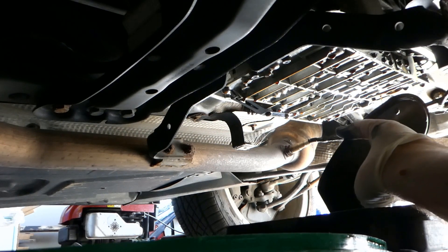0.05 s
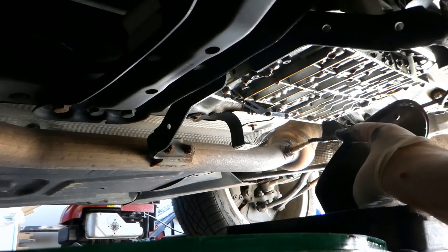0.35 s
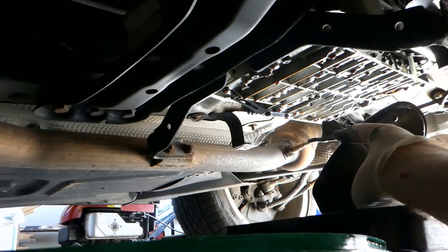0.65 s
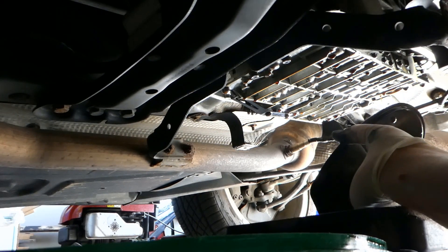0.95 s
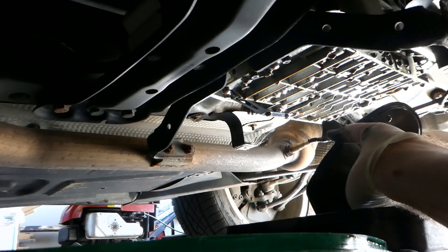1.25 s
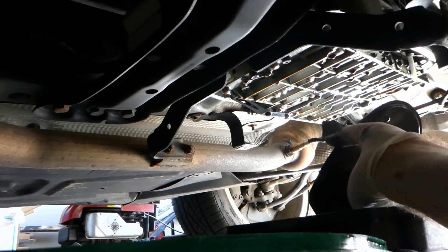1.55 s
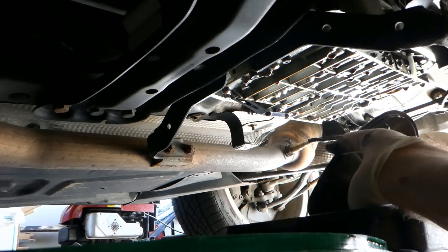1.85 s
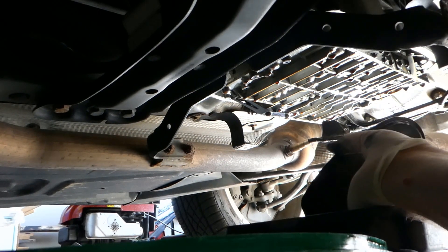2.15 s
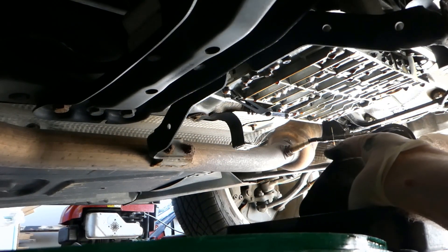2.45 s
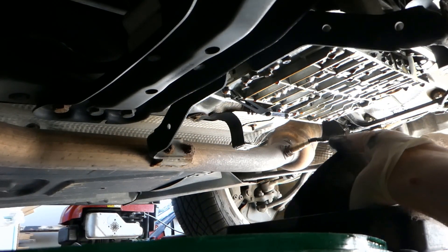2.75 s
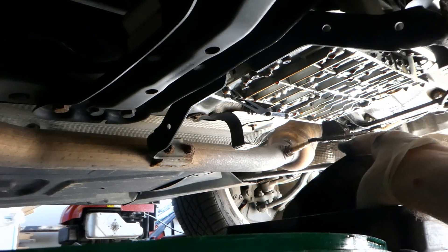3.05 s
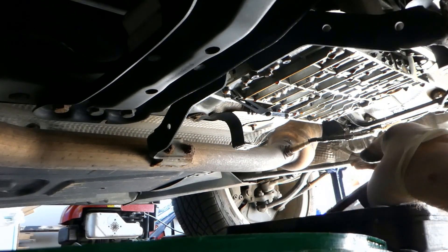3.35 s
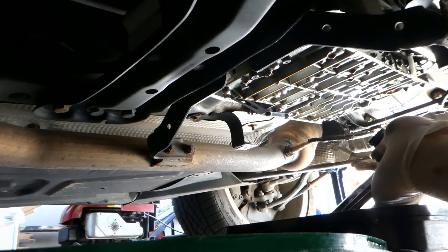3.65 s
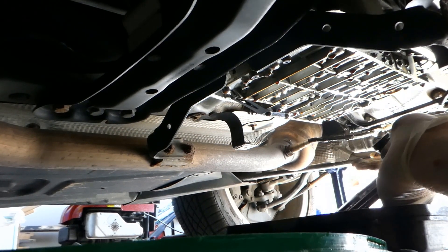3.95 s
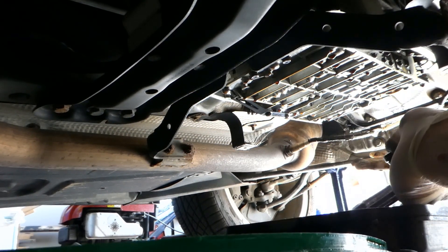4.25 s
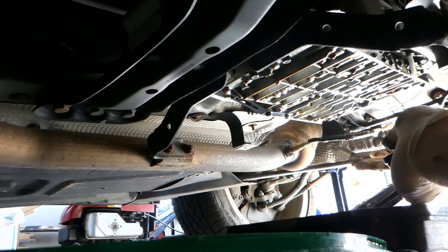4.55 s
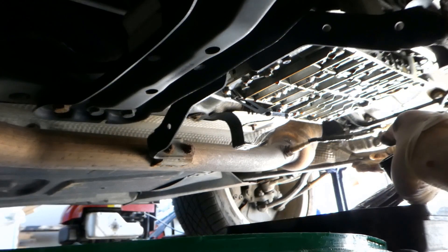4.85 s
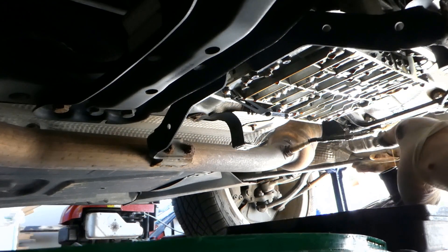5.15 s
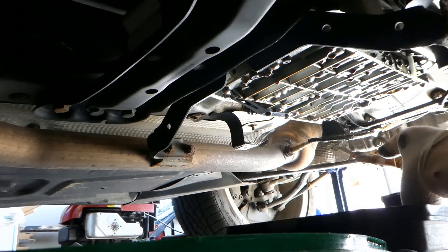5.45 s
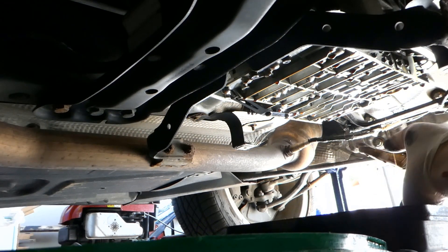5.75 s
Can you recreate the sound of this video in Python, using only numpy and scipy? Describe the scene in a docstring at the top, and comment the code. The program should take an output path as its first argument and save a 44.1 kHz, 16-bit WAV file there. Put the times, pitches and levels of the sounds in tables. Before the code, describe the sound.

Oil dribbles wetly into a plastic drain pan and thins to drips, then the pan is knocked and shifted on the floor.

```python
"""Oil dribbling into a drain pan

Oily fluid dribbles from under a car into a plastic pan close by, its pops and tiny bubbles ringing
in quick wet bursts. A part knocks down into the pan, and the dribble thins to single drips.
The pan booms and clacks as it is bumped, and rubs on the floor as it shifts; a glove scuffs softly.
The floor and the car's underside echo closely, over the hum of a garage."""
import sys
import numpy as np
from scipy import signal
from scipy.fft import rfft, irfft
from scipy.io import wavfile
from scipy.ndimage import uniform_filter1d

SR = 44100
rng = np.random.default_rng(int(sys.argv[2]) if len(sys.argv) > 2 else 0)


def output_pcm(signal):
    """Save a mono or channel-first signal as 16-bit PCM at the path in sys.argv[1].

    Samples are clipped to [-1, 1] before scaling.
    """
    pcm = np.clip(np.atleast_2d(signal).T, -1, 1) * 32767
    wavfile.write(sys.argv[1], SR, np.round(pcm).astype(np.int16))


N = 260190

# The tone of the garage's rumble and hiss. Each row: frequency in Hz, relative level in dB.
RUMBLE_TONE = [(20, -23), (45, -47), (70, -7), (120, -1.5), (190, -2), (240, -5), (400, -7), (600, -11),
               (1200, -23), (2500, -69)]
HISS_TONE = [(700, 7), (1400, 4), (2300, 6), (4000, 1), (6300, 0), (7900, -6), (9200, -3.5), (12000, -9.5),
             (15000, -17)]
# How loud the hiss is. Each row: time in seconds, level in dB.
HISS_LEVELS = [(0, -54.5), (1.4, -56.5), (4.5, -55.5), (5.9, -51.5)]
# The notes of the hum. Each row: pitch in Hz, level in dB.
HUM_NOTES = [(122, -59), (186, -65.5)]
# Rumble and hiss come from the left. Each row: frequency in Hz, boost of the left ear in dB.
LEFT_BOOST = [(80, 1), (200, 3.5), (500, 4.5), (1000, 5), (2000, 1), (5000, -1)]
# How alike the ears hear far and near noise. Each row: frequency in Hz, likeness (1 same, -1 opposite).
FAR_LIKENESS = [(30, -1.5), (80, 0.4), (180, 0.44), (280, -0.17), (450, -0.48), (1100, -0.65), (2000, 0.17),
                (4000, 0.6), (12000, 0.56)]
NEAR_LIKENESS = [(30, .5), (150, 0.87), (500, 0.95), (1200, 0.78), (3000, 0.79), (12000, 0.73)]
# The garage's echo. Each row: frequency in Hz, seconds to fade by 60 dB.
ECHO_FADES = [(100, 0.3), (400, 0.18), (1000, 0.73), (3000, 0.23), (7000, 0.087), (15000, 0.043)]
# Scuffs of the glove and slides of the pan. Each row: start in seconds, level in dB, length in seconds.
GLOVE_SCUFFS = [(1.54, -57, 0.22), (3.17, -61, .089), (4.154, -54.5, 0.09), (4.327, -53, 0.041),
                (4.68, -58.5, 0.37), (5.386, -50, 0.14), (5.67, -50, 0.056)]
PAN_SLIDES = [(2.771, -34, 0.075), (4.374, -43, .04), (4.77, -45, 0.064), (4.916, -44.5, 0.053),
              (5.038, -50.5, 0.26), (5.371, -45.5, .08), (5.523, -39.5, 0.083)]
# The notes the pan rings with. Each row: pitch in Hz, relative level in dB, seconds to fade by 60 dB.
PAN_NOTES = [(124.8, -8, 0.22), (182.2, -3, 0.25), (207, -4.5, 0.2), (231, -5, 0.19), (261.8, -9, 0.25),
             (285.3, -9.5, 0.34), (356.5, -9, 0.33), (456.7, -4.5, 0.22), (485, -3.5, 0.048),
             (531.5, 4, 0.13), (575.6, -10, 0.24), (663, -4, 0.14), (764, -14, 0.21), (805, -21, .11),
             (944, -16, 0.092), (992, 1, 0.052), (1322, -2, 0.04), (1534, -1, 0.06), (1567, -10, 0.15),
             (1800, -7.5, 0.15), (2080, -13, 0.066), (2200, -24, 0.085), (2700, -9.5, 0.16),
             (2670, -31, 0.059)]
# The tone of the pan's crowded low notes, of its walls and of the snap of contact.
# Each row: frequency in Hz, relative level in dB.
THUD_TONE = [(50, -33), (120, -18.5), (180, -1.5), (260, -4), (330, -16), (400, -8), (500, -0.5),
             (620, -7.5), (950, -5.5), (1200, -28), (2500, -68)]
CLACK_TONE = [(600, -13.5), (900, 0.5), (1100, -3.5), (1800, -3), (2700, -2.5), (3400, -10.5), (4500, -13),
              (9000, -38)]
SNAP_TONE = [(2000, -14), (3400, -0.5), (4200, -4), (5800, 4), (7200, -7), (8600, -8.5), (9700, -7),
             (12500, -15), (15500, -28)]
# Knocks on the pan. Each row: start in seconds, overall gain, clack gain and snap gain in dB,
# clack pitch in Hz, boom gain in dB, boom pitch in Hz, rise time in seconds.
PAN_KNOCKS = [(2.7456, -1, -8.5, -8.5, 2070, -5.5, 443, 0.00056),
              (2.865, -12.5, -8.5, -35, 990, -3.5, 190, 0.0039),
              (2.914, -15.5, -11.5, -43, 1380, -4, 475, .00081),
              (3.293, -22, -11.5, -14.5, 2000, 5.5, 500, 0.016),
              (3.541, -39.5, -32, -25, 900, 11.5, 544, 0.0022),
              (3.649, -25.5, -19, -40, 950, 8.5, 171, .00075),
              (4.121, -26.5, -35, -19, 900, 0.5, 536, .0013),
              (4.4053, -12.5, -5.5, -23.5, 955, 5.5, 530, 0.0017),
              (5.428, -14.5, -9.5, -23.5, 1300, 5, 566, 0.015),
              (5.4717, -13.5, 5, -16.5, 1340, 3.5, 165, 0.0013),
              (5.565, -36.5, 3.5, -25, 895, 4, 295, .008), (5.692, -36, -13, -15, 2300, -13, 125, .0035)]
# The tone of the spray around a splash. Each row: frequency in Hz, relative level in dB.
SPRAY_TONE = [(900, -47), (1600, 4.5), (3000, 6), (5000, 3.5), (6500, 1.5), (7800, -6), (9200, 3.5),
              (11500, -8), (15500, -16)]
# The thinning stream. Each row: time in seconds, base level in dB, pitch in Hz.
STREAM = [(0, -57.5, 2195), (1.02, -59, 2280), (1.25, -62, 2800), (1.95, -60, 2686), (2.3, -59.5, 2980),
          (2.68, -59.5, 2750), (2.95, -69, 2970), (5.9, -82, 2600)]
# The drips that stand out. Each row: start in seconds, gain in dB, splash pitch in Hz, spray gain in dB.
BIG_DRIPS = [(0.054, -47, 2260, -8), (0.068, -46, 2160, -6.5), (0.111, -46.5, 2060, -5.5),
             (0.312, -42.5, 2410, -6), (0.374, -44, 2370, -14), (0.438, -46, 2540, -4.5),
             (0.578, -45, 2350, -5), (0.656, -40.5, 2440, -9), (0.714, -49, 2410, -13),
             (0.763, -45.5, 2330, -8), (0.865, -48.5, 2220, -6), (0.903, -46.5, 2290, -8),
             (0.933, -42.5, 2280, -6.5), (0.961, -48, 2390, -9), (1.02, -49, 2270, -10),
             (1.069, -49, 2540, -7), (1.276, -44.5, 2640, -9), (1.307, -55, 2560, 2),
             (1.366, -48, 2850, -26), (1.45, -45.5, 2580, -7.5), (1.465, -44.5, 2790, -9),
             (2.034, -47.5, 2730, -13), (2.064, -50, 2810, -13), (2.108, -44.5, 2820, -10.5),
             (2.196, -46.5, 2920, -17), (2.279, -49, 3700, -7), (2.572, -47, 2720, -11),
             (2.711, -48.5, 3030, -6), (2.986, -52.5, 4040, -20), (3.044, -53.5, 3820, -3),
             (3.138, -43.5, 3650, -9.5), (3.452, -53, 5470, -3), (4.162, -43, 3090, -10),
             (4.631, -49.5, 5700, -3), (4.721, -48, 2610, -8)]

TIME = np.arange(N) / SR  # seconds, for the whole scene
RING = np.arange(SR // 2) / SR  # seconds, for one short sound


def amp(db):
    """Turns decibels into a number to multiply by."""
    return 10 ** (np.asarray(db) / 20)


def evened(x):
    """Scales a sound to an average strength (rms) of 1."""
    return x / np.sqrt(np.mean(x ** 2) + 1e-20)


def unit(x):
    """Gives a short sound the energy of 10 ms at strength 1."""
    return evened(x) * np.sqrt(SR / 100 / x.shape[-1])


def look_up(table, hz):
    """Reads a table between its rows, on a scale of octaves."""
    row_hz, value = np.transpose(table)
    return np.interp(np.log(hz + 1), np.log(row_hz + 1), value)


def curves(rows):
    """Joins timed rows into one curve for each value column."""
    times, *columns = np.transpose(rows)
    return [np.interp(TIME, times, column) for column in columns]


def add(mix, start, sound):
    """Lays a sound into the mix at a start time in seconds."""
    part = mix[..., max(round(start * SR), 0):][..., :sound.shape[-1]]
    part += sound[..., :part.shape[-1]]


def colour(x, tone):
    """Turns each frequency up or down to follow a tone table."""
    size = x.shape[-1]
    return irfft(rfft(x) * amp(look_up(tone, np.fft.rfftfreq(size, 1 / SR))), size)


def noise(tone, size, likeness=NEAR_LIKENESS):
    """Noise of a given tone, partly alike in the two ears."""
    shared, apart = rfft(rng.standard_normal((2, size)))
    same = np.clip(look_up(likeness, np.fft.rfftfreq(size, 1 / SR)), -1, 1)
    shared, apart = shared * np.sqrt(1 + same), apart * np.sqrt(1 - same)
    ears = irfft(np.array([shared + apart, shared - apart]), size)
    return evened(colour(ears, tone))


def resonate(x, hz, width_hz):
    """Makes a sound ring at a steady or moving pitch; a narrow width rings longer."""
    turn = np.exp(2j * np.pi * np.cumsum(hz * np.ones(x.shape[-1])) / SR)
    feedback = np.exp(-np.pi * abs(width_hz) / SR)
    return 2 * (turn * signal.lfilter([1 - feedback], [1, -feedback], x / turn + 1e-18)).real


def dying(fade_s, rise_s):
    """A loudness curve that builds up, and fades by 60 dB in fade_s."""
    return (1 - np.exp(-RING / max(rise_s, 1e-5))) * np.exp(-np.log(1000) * RING / fade_s)


def background(rumble_db=-51, waver_hz=3):
    """The garage's low rumble, wavering hum and soft hiss."""
    hum = 0
    for hz, db in HUM_NOTES:
        drift = waver_hz * evened(uniform_filter1d(rng.standard_normal(N), 3000))
        hum = hum + amp(db) * evened(np.sin(2 * np.pi * np.cumsum(hz + drift) / SR))
    rumble = amp(rumble_db) * noise(RUMBLE_TONE, N, FAR_LIKENESS)
    hiss = amp(curves(HISS_LEVELS)[0]) * noise(HISS_TONE, N, FAR_LIKENESS)
    left, right = rumble + hiss
    return np.array([colour(left, LEFT_BOOST), right]) + hum


def garage_echo(x):
    """The room's blurred echo, whose treble dies first."""
    hz, t, bands = signal.stft(noise([(100, -17), (16000, -6.0)], len(RING)), SR, nperseg=256)
    fade = np.exp(-np.log(1000) * t / look_up(ECHO_FADES, hz)[:, None])
    tail = signal.istft(bands * fade, SR, nperseg=256)[1][:, :len(RING)]
    tail = tail * (1 - np.exp(-RING / 0.004))
    return signal.oaconvolve(x, tail / np.linalg.norm(tail[0]), axes=1)[:, :N]


def with_car_echo(x, echo_db=-7):
    """Adds the quick bounces of sound between the floor and the car."""
    bounces = noise([(100, 7), (16000, -9)], len(RING)) * dying(0.038, 0.0049)
    bounces = bounces / np.linalg.norm(bounces[0])
    return x + amp(echo_db) * signal.oaconvolve(x[None], bounces, axes=1)[:, :N]


def glove_scuff(db, length_s, grains_per_s=3000):
    """A rubbing glove makes a soft swell of tiny clicks."""
    size = int(max(length_s, .02) * SR)
    grains = rng.standard_normal(len(RING)) * (rng.random(len(RING)) < grains_per_s / SR)
    grains = evened(colour(grains, SPRAY_TONE))[:size]
    return amp(db) * grains * np.hanning(len(grains))


def pan_rub(grip_spread_db=3, rise_s=0.012, release_s=0.034):
    """The floor grips the sliding pan unevenly and makes it ring."""
    push = 0
    for start, db, length in PAN_SLIDES:
        build_up = np.clip((TIME - start) / rise_s, 0, 1)
        die_away = np.exp(-np.maximum(TIME - start - length, 0) / release_s)
        push = push + amp(db) * build_up * die_away
    grip = amp(grip_spread_db * evened(uniform_filter1d(rng.standard_normal(N), 900)))
    scrape = noise(THUD_TONE, N) * grip
    hollow = 2.8 * resonate(scrape, 535, 38) + 2.8 * resonate(scrape, 210, 69)
    hollow += 9 * resonate(scrape, 106, 52)
    return push * evened(scrape + hollow)


def pan_knock(db, clack_db, snap_db, clack_hz, boom_db, boom_hz, rise_s):
    """A blow makes the pan's bottom boom and thud and its walls clack, with a brief snap of contact."""
    boom, ping = 0, 0
    for hz, note_db, fade_s in PAN_NOTES:
        # each ear hears the pan from its own angle
        phase = 2 * np.pi * rng.random() + 0.22 * rng.standard_normal((2, 1))
        detune = 1 + 0.0066 * rng.standard_normal()
        note = amp(note_db) * np.sin(2 * np.pi * hz * detune * RING + phase)
        # where the blow lands favours the notes near boom_hz and clack_hz
        if hz < 1150:
            swell_s = rise_s + 1.0 / hz  # low notes take longer to build up
            boom = boom + note * dying(fade_s, swell_s) * amp(8 / (1 + ((hz - boom_hz) / 45) ** 2))
        else:
            ping = ping + note * dying(fade_s, rise_s) / (1 + ((hz - clack_hz) / 480) ** 2)
    thud = noise(THUD_TONE, len(RING)) * dying(0.13, rise_s + 0.0013)
    walls = noise(CLACK_TONE, len(RING))
    walls += 1.5 * evened(resonate(walls, clack_hz, 400))
    walls *= dying(0.032, rise_s + 0.0006) + 0.5 * dying(0.12, rise_s)
    snap = noise(SNAP_TONE, len(RING))
    snap *= dying(0.0081, rise_s / 2) + 0.34 * dying(0.065, rise_s) + 0.013 * dying(0.58, rise_s)
    bottom = amp(boom_db - 13) * unit(boom) + amp(-15) * unit(thud)
    clack = amp(-10) * unit(walls) + amp(-17) * unit(ping)
    return amp(db) * (bottom + amp(clack_db) * clack + amp(snap_db - 8.5) * unit(snap))


def bubble(hz, cycles, glide=0.0266):
    """A tiny bubble rings for some cycles, rising in pitch as it surfaces."""
    turns = hz * RING[:SR // 40]
    age = turns / max(cycles, 1)
    note = np.sin(2 * np.pi * turns * (1 + glide * np.minimum(age, 4)))
    return note * (1 - np.exp(-4 * age)) * np.exp(-age)


def froth(hz, length_s, count=7):
    """A clump of tiny bubbles of similar size bursts within a moment."""
    out = np.zeros(SR // 10)
    starts = rng.gamma(2, .5, count) * length_s
    pitches = hz * np.exp(.14 * rng.standard_normal(count))
    gains = amp(3.5 * rng.standard_normal(count))
    for start, pitch, gain in zip(starts, pitches, gains):
        add(out, start, gain * bubble(min(pitch, SR / 3), cycles=10.5))
    return unit(out)


def drip(db, hz, spray_db, spatter_s=.0056, spray_ratio=1.75):
    """A drop squelches: pops ring a pocket of fluid, which sheds one bubble and a finer, higher froth."""
    length_s = max(spatter_s * np.exp(.2 * rng.standard_normal()), .0015)
    spray_hz = hz * spray_ratio * np.exp(0.202 * rng.standard_normal())
    t = RING[:SR // 10]
    swell = (t / length_s) ** 1.4 * np.exp(-2 * t / length_s)
    pops = rng.standard_normal(len(t)) * (rng.random(len(t)) < 3500 / SR) * swell
    splash = unit(resonate(resonate(pops, hz, 440), hz, 2030))
    plink = np.zeros(len(t))
    add(plink, length_s * 0.296, bubble(hz * .96, cycles=9.6))
    stray = froth(7500 * np.exp(0.38 * rng.standard_normal()), length_s * 1.6)
    spray = amp(-2) * froth(spray_hz, length_s) + amp(-7) * stray
    spray += amp(-0.6) * unit(colour(pops, SPRAY_TONE))
    return amp(db) * (amp(-3) * splash + amp(-3) * unit(plink) + amp(spray_db) * spray)


def droplets(per_s=15, jitter=0.28, boost_db=6.5, spread_db=2.5, pitch_spread=0.068):
    """The stream breaks into nearly regular small drips that follow its level and pitch."""
    out = np.zeros(N)
    times, stream_db, stream_hz = np.transpose(STREAM)
    for k, (late, size, pitch, wet) in enumerate(rng.standard_normal((int(per_s * N / SR), 4))):
        start = max((k + jitter * late) / per_s, 0)
        db = np.interp(start, times, stream_db) + boost_db + spread_db * size
        hz = np.interp(start, times, stream_hz) * np.exp(pitch_spread * pitch)
        add(out, start, drip(db, hz, spray_db=-6.5 + 5 * wet))
    return out


def dribble(pops_per_s=330, spray_db=-11, fizz_db=-7, clumps_per_s=1.2):
    """Random pops and clumps of froth keep the fluid burbling; the pitch wanders up as the flow thins."""
    db, hz = curves(STREAM)
    pops = (rng.random(N) < pops_per_s / SR) * rng.choice([-1, 1], N)
    pops = pops * amp(5 * np.minimum(rng.exponential(1, N), 3))  # a few pops are much louder
    fizz = 0
    for pitch in np.geomspace(3500, 14000, 24):  # each pitch gets its own clumps
        clumps = (rng.random(N) < clumps_per_s / SR) * amp(3.4 * np.minimum(rng.exponential(1, N), 2.5))
        bubbles = signal.oaconvolve(clumps, froth(pitch, 0.0054))[:N]
        fizz = fizz + amp(look_up(SPRAY_TONE, pitch) / 2) * bubbles
    burble = evened(resonate(resonate(pops, hz, 250), hz, 1000))
    spray = evened(colour(pops, SPRAY_TONE))
    return amp(db - 2.5) * (burble + amp(spray_db) * spray + amp(fizz_db) * evened(fizz))


def scene():
    """Mixes the fluid, glove and pan with their echoes and the garage's background."""
    fluid = dribble() + droplets()
    glove, pan = np.zeros(N), np.zeros((2, N))
    for start, *row in BIG_DRIPS:
        add(fluid, start, drip(*row))
    for start, *row in GLOVE_SCUFFS:
        add(glove, start, glove_scuff(*row))
    for start, *row in PAN_KNOCKS:
        add(pan, start, pan_knock(*row))
    # a small pan gives off little deep bass
    bass_cut = signal.butter(N=2, Wn=110, btype="high", fs=SR, output="sos")
    pan = signal.sosfilt(bass_cut, pan) + pan_rub()
    under_car = with_car_echo(fluid + glove)
    echo = garage_echo(amp(-15) * under_car + amp(-25.5) * pan)
    return under_car + pan + echo + background()


def record(dry):
    """Cuts away the very highest treble, above 15750 Hz."""
    treble_cut = signal.firwin(511, 15750, window=("kaiser", 9), fs=SR)
    return signal.oaconvolve(dry, treble_cut[None], "same")


dry = scene()
out = record(dry)
output_pcm(out)
```